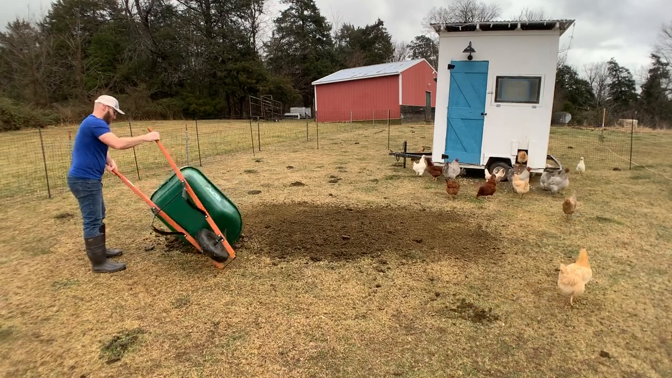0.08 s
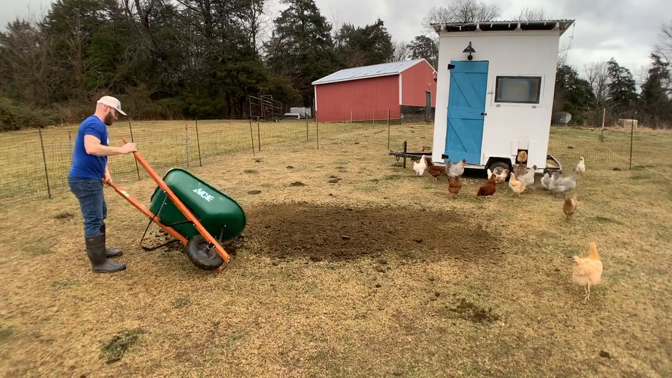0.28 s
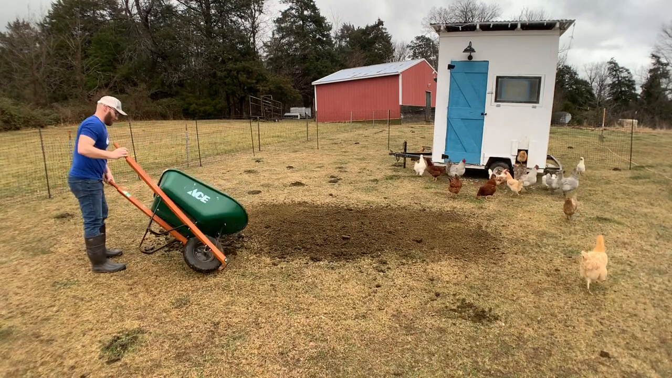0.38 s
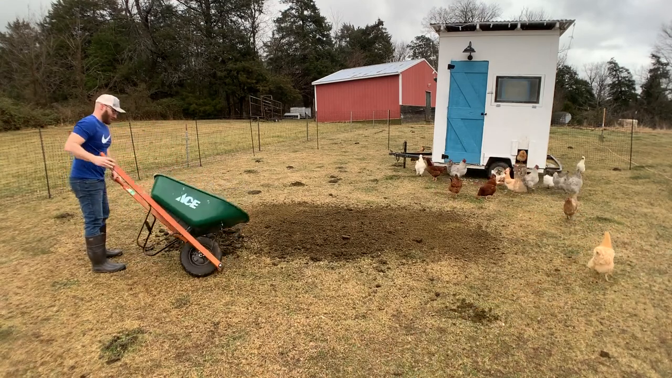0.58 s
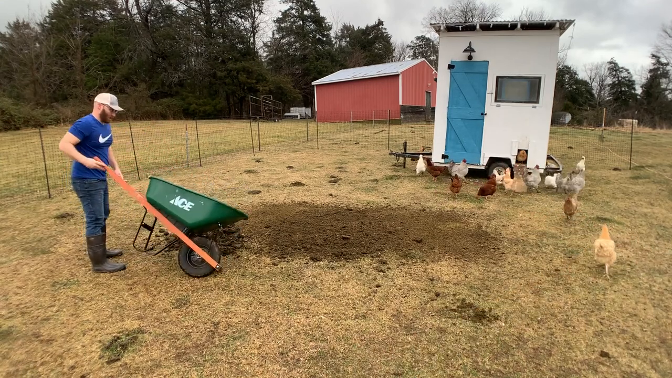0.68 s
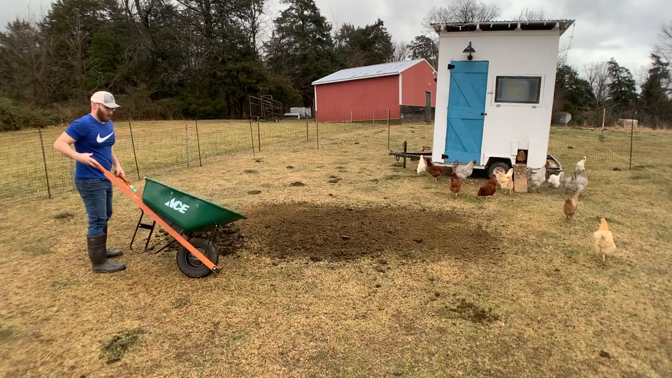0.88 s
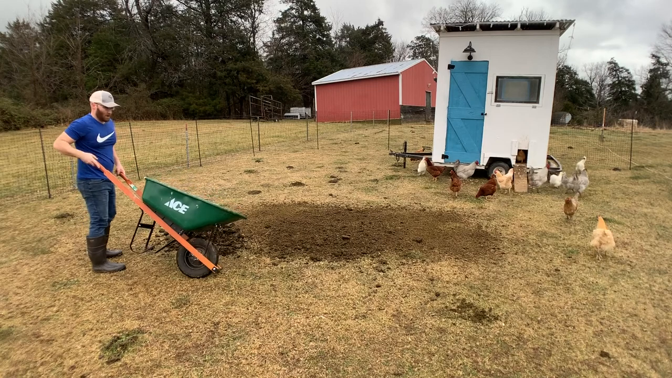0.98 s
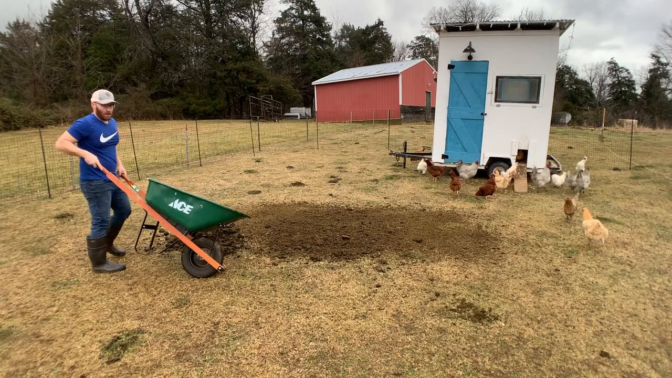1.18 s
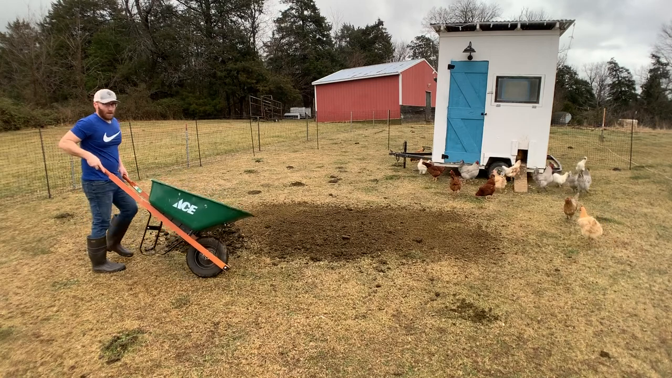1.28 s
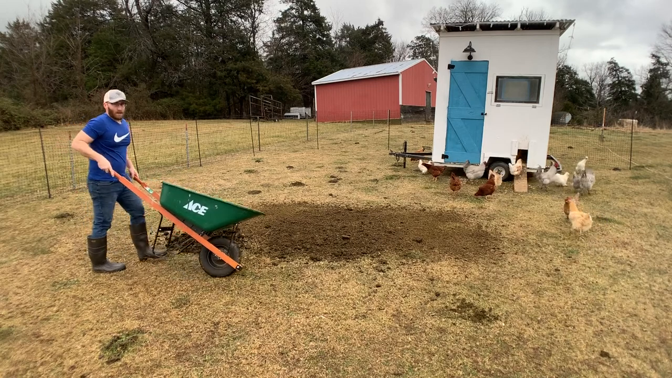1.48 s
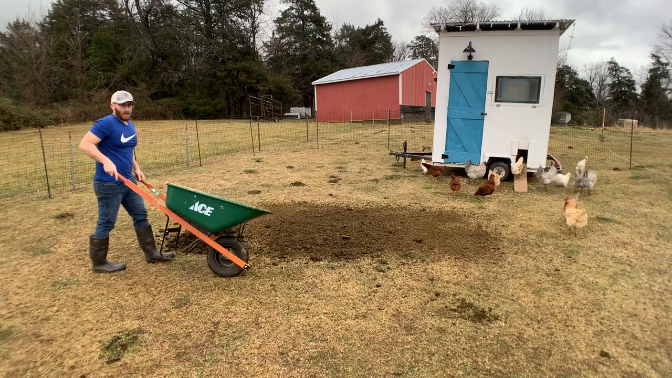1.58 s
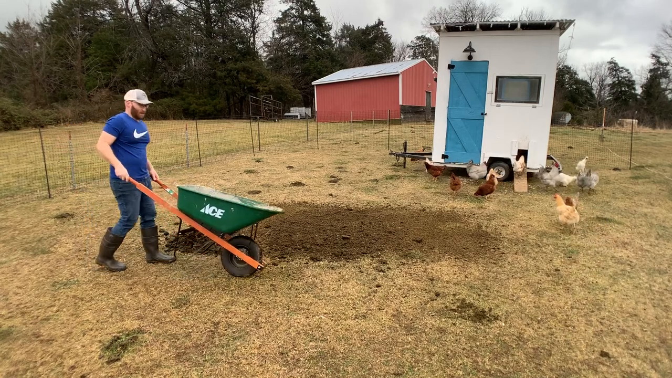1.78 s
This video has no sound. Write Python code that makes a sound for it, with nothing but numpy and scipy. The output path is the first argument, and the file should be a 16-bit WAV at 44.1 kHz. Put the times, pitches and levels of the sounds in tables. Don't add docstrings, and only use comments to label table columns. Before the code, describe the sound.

An empty steel wheelbarrow lands with a loud hollow boom and clang, bouncing and rattling, then a smaller frame knock; faint birds, a soft hen cluck and distant traffic hum, in an open yard, heard in stereo.

```python
import sys
import numpy as np
from scipy import signal
from scipy.fft import rfft, irfft
from scipy.io import wavfile

SR = 44100
rng = np.random.default_rng(int(sys.argv[2]) if len(sys.argv) > 2 else 0)


def dump(signal):
    limited = np.clip(np.atleast_2d(signal).T, -1, 1)
    pcm = np.round(limited * 32767).astype(np.int16)
    wavfile.write(sys.argv[1], SR, pcm)


def decibels_to_gain(level_db):
    exponent = np.asarray(level_db, float) / 20
    return 10 ** exponent


N = 79380

# (frequency [Hz], density [dB per Hz])
YARD_SPECTRUM = [(30, 2), (60, 4), (110, 1), (300, -24), (900, -16), (2600, -40), (6500, -39.5),
                 (16000, -51.5)]
# (frequency [Hz], correlation [-1..1])
YARD_LIKENESS = [(50, 0.86), (200, 0.78), (600, 0.27), (1500, 0.056), (3000, 0.11), (6000, 0.51),
                 (12000, 1)]
# (start [s], length [s], from [Hz], to [Hz], arch [Hz], level [dB])
CHIRPS = [(.135, .042, 4400, 3400, 250, -68), (.757, .028, 3130, 3130, 0, -74),
          (.798, .068, 3330, 3570, 20, -67), (.943, .027, 4200, 4600, 0, -74),
          (1.09, .02, 6500, 6900, 0, -76), (1.224, .03, 4520, 4420, -70, -72),
          (1.28, .034, 3350, 3350, 400, -64), (1.308, .024, 4150, 3600, 120, -69),
          (1.312, .016, 3300, 3400, 0, -70), (1.516, .042, 3500, 3100, 400, -67),
          (1.524, .034, 4000, 3900, 200, -69), (1.535, .028, 3900, 3500, 100, -70)]
CLUCK_HARMONICS_DB = [0.5, 4.5, -4, -36, -31]
# (start [s], length [s],
# level [dB], low edge [Hz], high edge [Hz])
BRUSHES = [(0.0, 0.03, -72, 6000, 9300), (0.118, 0.019, -64.5, 5700, 8800),
           (0.187, 0.048, -49.5, 400, 5300), (1.09, 0.035, -65, 500, 560), (1.453, .08, -68, 400, 450),
           (1.435, 0.052, -73, 1900, 2500), (1.15, .06, -78.5, 6200, 7700), (1.622, 0.012, -72, 3500, 7000),
           (1.68, 0.06, -68, 280, 3000), (1.746, 0.077, -67, 240, 3200), (1.6, 0.2, -67.5, 230, 690),
           (1.645, .1, -69, 4200, 6800), (1.69, .16, -69, 3300, 5600), (.02, .14, -62, 150, 250),
           (.70, .2, -53, 330, 480), (1.38, .2, -67, 280, 550)]

# (time [s], boom [dB], clang [dB], rattle [dB], extra rattle treble [dB])
CONTACTS = [(0.2063, -15.5, -25.5, -33, 3.5), (0.2132, -22.5, -28, -40, 1), (.225, -14.5, -25, -34.5, -0.5),
            (.240, -21, -31.5, -41.5, -7), (0.258, -26, -23.5, -40, 0), (0.2798, -37, -30, -40.5, -11),
            (0.2907, -23.5, -31.5, -36.5, -1.5), (.298, -36.5, -35.5, -43.5, -9.5),
            (0.3175, -28, -36, -50.5, -12), (0.3295, -24.5, -28.5, -39, -4.5), (.347, -42.5, -27, -48, -5),
            (.36, -34, -39, -53, -7), (0.376, -24, -36.5, -60.5, -10), (0.4020, -28.5, -35, -55.5, -7),
            (.43, -39.5, -40.5, -62.5, -13), (.455, -45.5, -52, -61.5, -8.5),
            (.467, -29.5, -48, -67.5, -22), (.535, -39, -50.5, -81, -10), (0.632, -35, -39.5, -54.5, -3.5),
            (0.647, -34, -41, -63, -6), (0.6633, -58, -43, -64, -6), (0.6826, -38.5, -29, -47, -2.5),
            (0.7139, -28.5, -47, -65.5, -10), (0.7823, -34.5, -62, -74, -12), (1.071, -48.5, -59, -77, -8)]
# (frequency [Hz], level [dB], t60 [s])
BOOM_MODES = [(85.5, -6.5, 0.98), (92, -2.5, 0.51), (108, -1, 0.13), (126.2, -3, 0.83), (146.5, -8, 0.52),
              (167, -7, 0.67), (188.5, 0, 0.18), (231.3, -13, 0.47), (254.5, -7.5, 0.17), (295, -20, 0.085)]
# (frequency [Hz], level [dB], t60 [s])
PANEL_MODES = [(273.7, -15, .3), (385, -19, 0.34), (468.5, -16.5, 0.38), (620, -20, 0.32),
               (788, -17.5, 0.18), (920.4, -16.5, 0.24), (1125, -25.5, 0.2), (1305, -26.5, 0.15),
               (2242, -31, 0.13)]
# (frequency [Hz], level [dB])
SHEET_LEVEL = [(300, -10), (400, -10), (550, -13), (760, -12.5), (950, -14.5), (1300, -21.5), (1900, -30),
               (2600, -16.5)]
# (frequency [Hz], t60 [s])
SHEET_T60 = [(300, 0.65), (800, 0.28), (2600, 0.034)]
# (frequency [Hz], density [dB per Hz])
RATTLE_SPECTRUM = [(1500, 0), (2500, -3), (4000, -5), (6200, 0), (8000, -6), (10500, -11), (13000, -34),
                   (15500, -13.5)]
# (frequency [Hz], t60 [s])
RATTLE_T60 = [(1500, 0.085), (5000, 0.075), (8000, 0.047), (15000, 0.04)]
# (frequency [Hz], level [dB])
RATTLE_TAIL = [(1500, -19), (4000, -16.5), (7000, -26.5), (9000, -32)]
# (time [s], level [dB], centre [Hz], width [Hz])
KNOCKS = [(.2057, -19, 760, 240), (.2083, -21, 760, 103), (.215, -28.5, 417, 98), (.633, -44, 1300, 380),
          (.684, -30.5, 1240, 410), (.2055, -24.5, 1040, 220), (.208, -39.5, 2120, 160),
          (.229, -22.5, 902, 250), (.33, -24.5, 280, 60), (0.2088, -16.5, 108, 17), (0.294, -23, 730, 230),
          (.292, -32, 930, 42), (0.313, -20, 167, 13.5), (0.421, -29.5, 92, 34), (.52, -38.5, 87, 7.5),
          (.643, -33, 91, 37), (.6842, -14.5, 606, 420), (.6860, -16.5, 466, 450), (.70, -34.5, 183, 15),
          (1.041, -41, 96.4, 24), (1.554, -46, 64, 12.2),
          (.6330, -47, 4900, 300), (.6325, -47, 2200, 400), (.6836, -34, 2300, 500), (.6836, -39, 5000, 900),
         (.6834, -38, 11000, 6000), (.6848, -22, 300, 110),
          (.2134, -9, 350, 800),
    (.2086, -13, 262, 50),
          (.347, -29.5, 1600, 900), (.376, -42, 1900, 304), (0.4029, -31.5, 370, 149), (.404, -36, 602, 200),
         (.467, -37.5, 332, 119), (.521, -43.5, 507, 150), (.535, -47, 630, 298), (0.563, -50.5, 454, 150),
         (0.693, -28, 486, 202), (.783, -64.5, 4080, 300), (0.84, -46, 440, 150), (1.072, -53, 553, 242),
         (1.49, -60, 199, 200), (1.625, -67, 4400, 397), (1.702, -72, 4560, 400)]

# (delay [s], level [dB])
ECHOES = [(.001, -9.5), (0.019, -21.5), (.047, -11.5), (.083, -18), (.13, -28)]
# (frequency [Hz], left lead [rad])
PORT_PHASE = [(500, 0.7953), (1100, 0.81), (2400, 2.04), (4200, 4.5), (6500, 5), (8700, 3), (11000, 0.2),
              (16000, -6)]


def at_hz(points, hz):
    table = np.array(points)
    return np.interp(np.log(hz), np.log(table[:, 0]), table[:, 1])


def rms_one(x):
    return x / np.sqrt(np.mean(x ** 2) + 1e-20)


def clicks(time_s, gain):
    out = np.zeros(N) + 1e-18
    np.add.at(out, (np.asarray(time_s) * SR).astype(int), gain)
    return out


def ring(x, hz, t60_s):
    radius = decibels_to_gain(-60 / (t60_s * SR))
    w = 2 * np.pi * hz / SR
    return signal.lfilter([0, np.sin(w)], [1, -2 * radius * np.cos(w), radius * radius], x)


def power_decay(x, t60_s):
    return signal.lfilter([1], [1, -decibels_to_gain(-120 / (t60_s * SR))], x)


def band(x, low_hz, high_hz):
    return signal.sosfilt(signal.butter(2, [low_hz, high_hz], "band", fs=SR, output="sos"), x)


def colour(x, spectrum):
    hz = np.arange(N // 2 + 1) * SR / N
    return irfft(rfft(x) * decibels_to_gain(at_hz(spectrum, hz + 1)), N)


def swell(start_s, length_s):
    u = np.clip((np.arange(N) / SR - start_s) / length_s, 0, 1)
    return u, np.sin(np.pi * u)


def yard(patchy_db):
    white = rng.standard_normal((2, 2, N))
    edges_hz = 22 * 2 ** np.arange(0, 10, .5)
    edges_hz[-1] = 16500
    out = 0
    for k, (low_hz, high_hz) in enumerate(zip(edges_hz, edges_hz[1:])):
        mid, side = band(white[k % 2], low_hz, high_hz)
        hz = np.sqrt(low_hz * high_hz)
        alike = np.clip(at_hz(YARD_LIKENESS, hz), -.99, .99)
        waver = np.interp(np.arange(N), np.linspace(0, N, 10), rng.standard_normal(10))
        pair = np.sqrt(1 + alike) * mid + np.sqrt(1 - alike) * side * [[1], [-1]]
        out = out + decibels_to_gain(at_hz(YARD_SPECTRUM, hz) + patchy_db * waver) * pair
    return decibels_to_gain(-56) * rms_one(out)


def birds():
    out = 0
    for start_s, length_s, from_hz, to_hz, arch_hz, db in CHIRPS:
        u, env = swell(start_s, length_s)
        hz = from_hz + (to_hz - from_hz) * u + arch_hz * env
        out = out + decibels_to_gain(db) * np.sqrt(env) * np.sin(2 * np.pi * np.cumsum(hz) / SR)
    out = out * (1 + .2 * rms_one(band(rng.standard_normal(N), 60, 300)))
    return out + .25 * np.roll(out, 450) + .15 * np.roll(out, 1100)


def hen():
    u, env = swell(start_s=1.116, length_s=0.056)
    jitter_hz = 9 * rms_one(band(rng.standard_normal(N), 28, 180))
    pitch_hz = 262 - 15 * env + jitter_hz
    phase = 2 * np.pi * np.cumsum(pitch_hz) / SR
    voice = sum(decibels_to_gain(db) * np.cos((k + 1) * phase) for k, db in enumerate(CLUCK_HARMONICS_DB))
    return decibels_to_gain(-54.5) * env ** 1.24 * voice


def boots():
    grains = rng.standard_normal(N) * decibels_to_gain(2.5 * np.minimum(rng.exponential(1, N), 4))
    out = 0
    for start_s, length_s, db, low_hz, high_hz in BRUSHES:
        _, env = swell(start_s, length_s)
        out = out + decibels_to_gain(db) * env * rms_one(band(grains, low_hz, high_hz))
    return out


def shudder():
    time_s, boom_db, *_ = np.transpose(CONTACTS)
    level = np.sqrt(power_decay(clicks(time_s, decibels_to_gain(2 * boom_db)), t60_s=0.73))
    noise = rng.standard_normal(N)
    rumble = sum(decibels_to_gain(db) * ring(noise, hz, 0.19) for hz, db, _ in BOOM_MODES)
    return decibels_to_gain(-12) * level * rms_one(band(rumble, 65, 300))


def knocks():
    out = 0
    for time_s, db, hz, width_hz in KNOCKS:
        pulse = ring(clicks([time_s], 1), hz, 2.32 / width_hz)
        pulse = ring(pulse, hz, 1.35 / width_hz)
        pulse = signal.lfilter(*signal.butter(2, hz / 3, "high", fs=SR), pulse)
        out = out + decibels_to_gain(db) * pulse / np.abs(pulse).max()
    return out


def rattle():
    grains_per_s, ring_hz, ring_db, colour_spread_db = 4400, (4623, 5900, 6420), -9, 3
    time_s, _, _, rattle_db, top_db = np.transpose(CONTACTS)
    grains = (rng.random(N) < grains_per_s / SR) * rng.standard_normal(N)
    grains = grains + 0.13 * rng.standard_normal(N)
    rings = rms_one(sum(hz ** 2 * ring(grains, hz, .05) for hz in ring_hz))
    grit = rms_one(colour(grains, [(600, -8.5)] + RATTLE_SPECTRUM)) + decibels_to_gain(ring_db) * rings

    edges_hz = np.geomspace(1000, 17000, 11)
    luck = rng.standard_normal((len(time_s), 10))
    out = 0
    for k, (low_hz, high_hz) in enumerate(zip(edges_hz, edges_hz[1:])):
        hz = np.sqrt(low_hz * high_hz)
        db = rattle_db + 5.0 + top_db * (low_hz > 7000) + colour_spread_db * luck[:, k]
        power = decibels_to_gain(2 * db)
        fast = power_decay(clicks(time_s, power), at_hz(RATTLE_T60, hz))
        slow = power_decay(clicks(time_s, power * np.sqrt(power / power.max())), t60_s=0.86)
        total = fast + decibels_to_gain(2 * at_hz(RATTLE_TAIL, hz)) * slow
        env = np.sqrt(signal.lfilter([.02], [1, -.98], total))
        out = out + env * band(grit, low_hz, high_hz)
    return out


def struck(modes, contact_db, spread_db, soft_hz):
    time_s = np.array(CONTACTS)[:, 0]
    luck = rng.standard_normal((len(CONTACTS), len(modes), 2))
    out = 0
    for k, (hz, mode_db, t60_s) in enumerate(modes):
        gain = decibels_to_gain(contact_db + mode_db + spread_db * luck[:, k, 0]) * np.sign(luck[:, k, 1])
        out = out + ring(clicks(time_s, gain), hz, t60_s)
    return signal.lfilter(*signal.butter(2, soft_hz, fs=SR), out)


def tub():
    _, boom_db, clang_db, _, _ = np.transpose(CONTACTS)
    hz = np.geomspace(300, 2600, 90) * np.exp(.01 * rng.standard_normal(90))
    t60_s = at_hz(SHEET_T60, hz) * np.exp(0.088 * rng.standard_normal(90))
    sheet = list(zip(hz, at_hz(SHEET_LEVEL, hz) - 13.5, t60_s)) + PANEL_MODES
    boom = band(struck(BOOM_MODES, boom_db - 9.5, spread_db=3.0, soft_hz=385), 70, 704.4)
    clang = struck(sheet, clang_db, spread_db=3.5, soft_hz=4990)
    return boom + clang


def echoes(x):
    source = band(x, 280, 9000)
    env = sum(decibels_to_gain(db - 36.5) * swell(delay_s, 0.039)[1] for delay_s, db in ECHOES)[:SR // 4]
    out = np.zeros((2, N))
    for side in range(2):
        out[side] = signal.fftconvolve(source, env * rng.standard_normal(SR // 4))[:N]
    return out


def ports(x, bump):
    bump_hz, bump_width_hz, right_treble_db = 761, 277, 0.5
    hz = np.arange(N // 2 + 1) * SR / N
    phase_hz, lead_rad = np.transpose([(0, 0)] + PORT_PHASE)
    turn = np.exp(.5j * np.interp(hz, phase_hz, lead_rad))
    detune = (hz ** 2 - bump_hz ** 2) / (hz + 1) / bump_width_hz
    left = np.abs(1 + bump / (1 + 1j * detune))
    right = decibels_to_gain(right_treble_db * hz / (hz + 900))
    return irfft(rfft(x) * np.array([left * turn, right / turn]), N)


def scene():
    barrow = band(tub() + shudder() + rattle() + knocks(), 62, 18000)
    near = ports(barrow + boots(), bump=1.33) + decibels_to_gain(-7.5) * echoes(barrow)
    scatter = decibels_to_gain(-9.5) * np.array([rattle(), rattle()])
    song = decibels_to_gain(-5.5) * birds()
    song_pair = np.array([song, np.roll(song, 2)])
    far = ports(hen() + yard(patchy_db=1.5), bump=0.47)
    return near + scatter + song_pair + far


def top_cut(x):
    return signal.sosfilt(signal.butter(12, 16810, fs=SR, output="sos"), x)


def record(dry):
    x = signal.sosfilt(signal.butter(3, 48, "high", fs=SR, output="sos"), dry)
    mix = signal.sosfilt(signal.cheby2(10, 50, 16900, fs=SR, output="sos"), x)
    return top_cut(mix)


dry = scene()
out = record(dry)
dump(out)
```